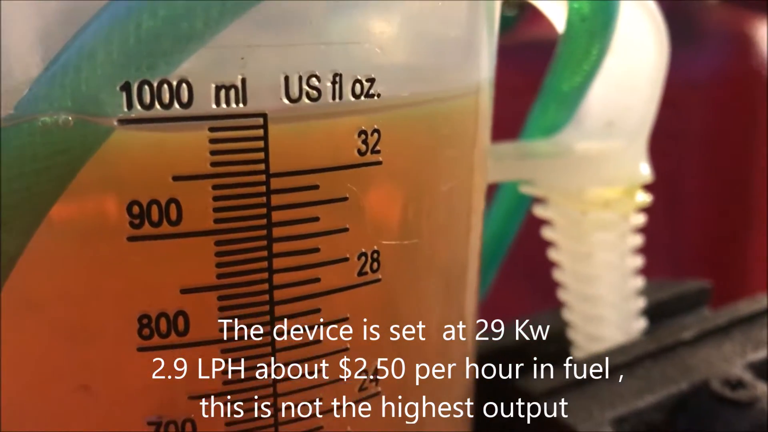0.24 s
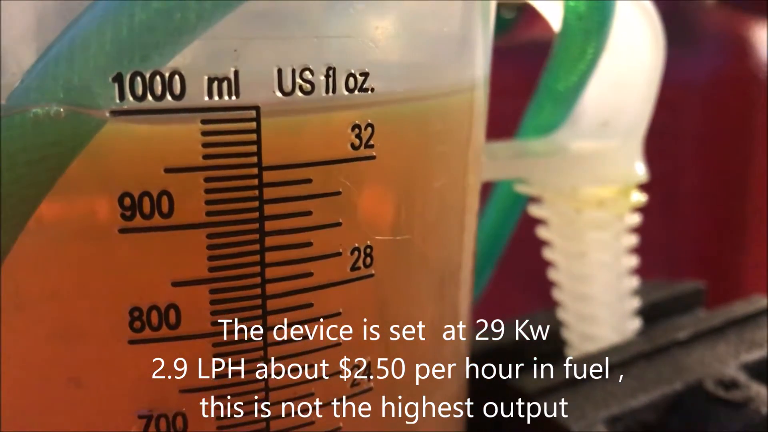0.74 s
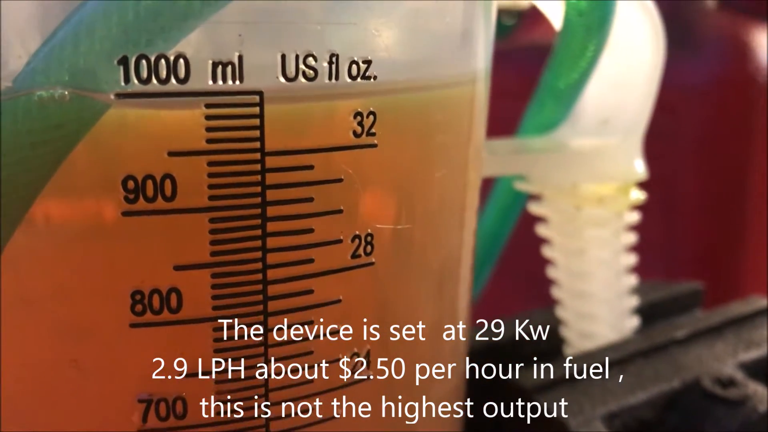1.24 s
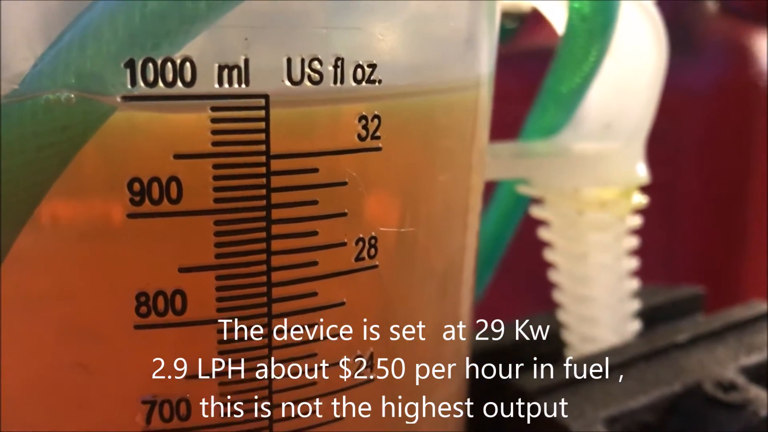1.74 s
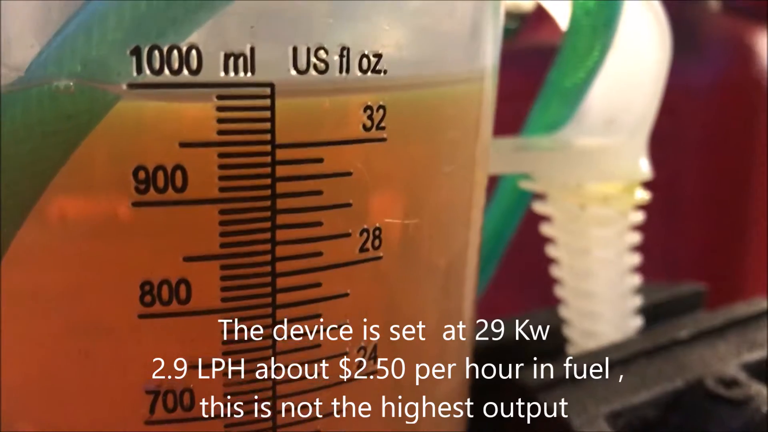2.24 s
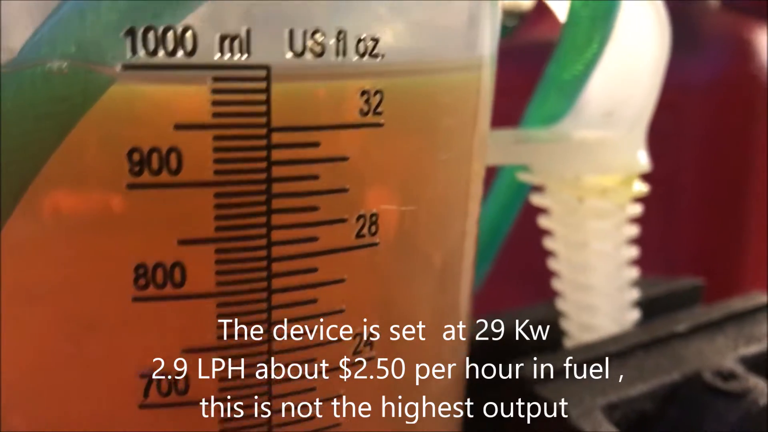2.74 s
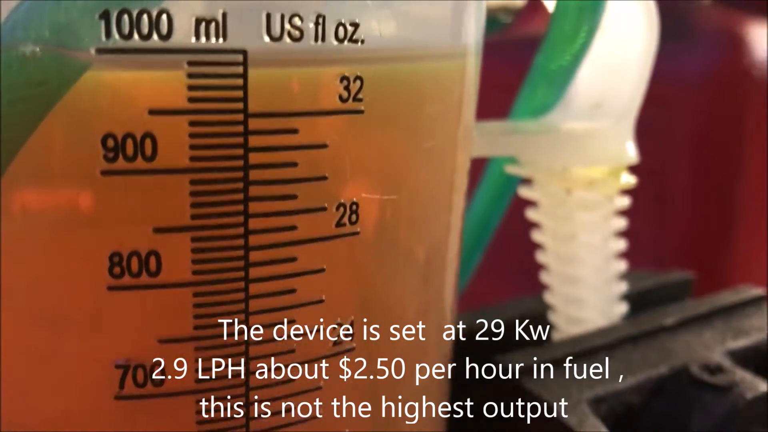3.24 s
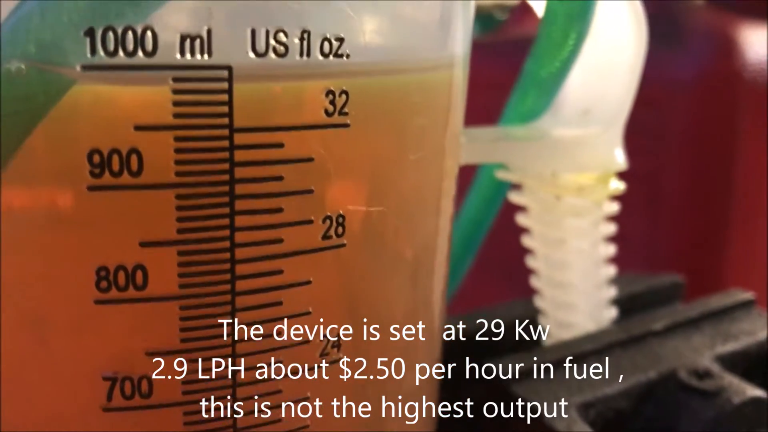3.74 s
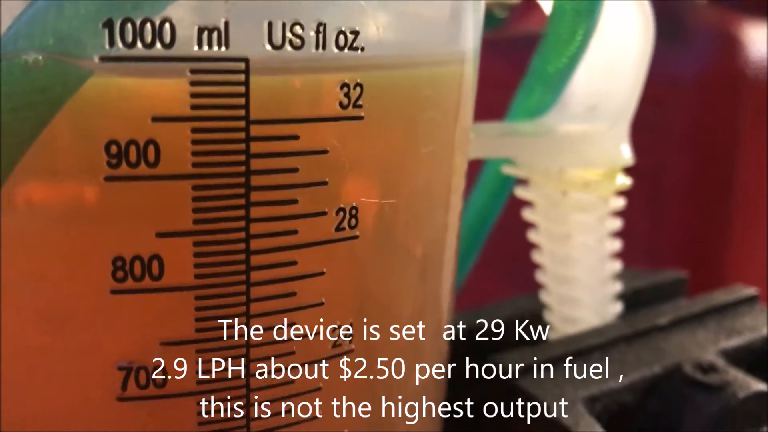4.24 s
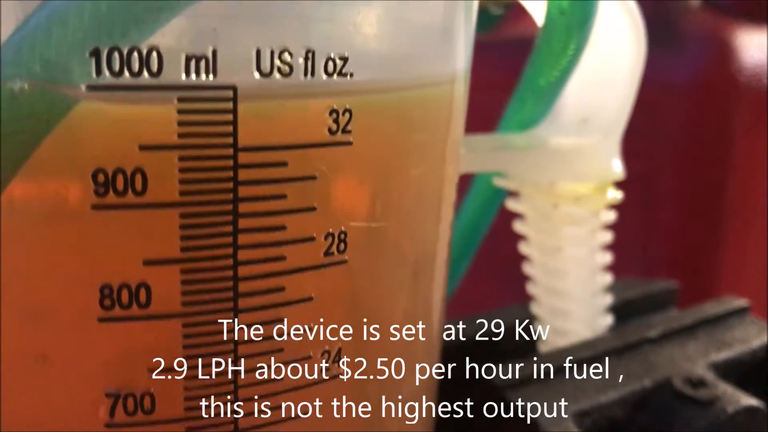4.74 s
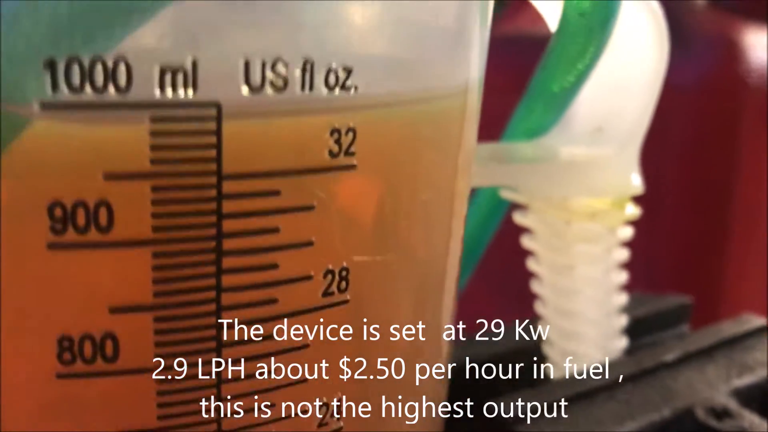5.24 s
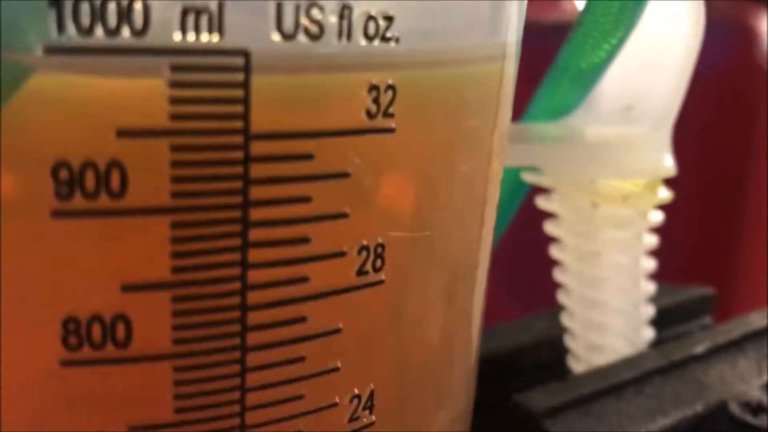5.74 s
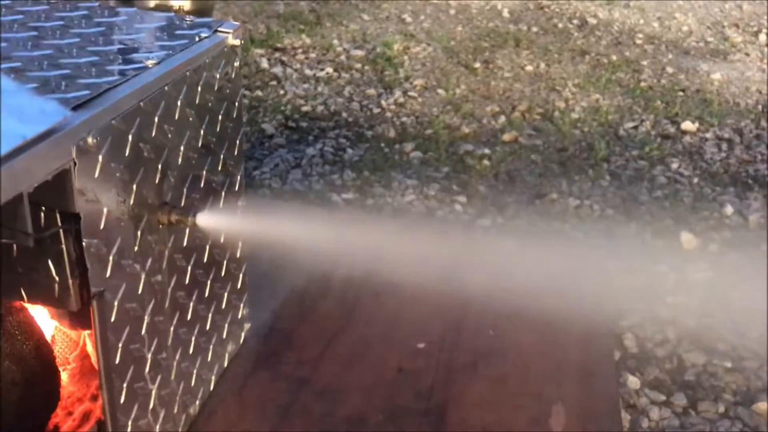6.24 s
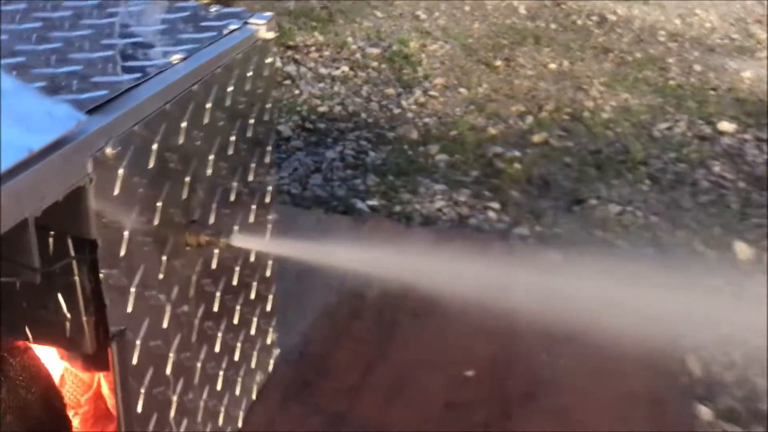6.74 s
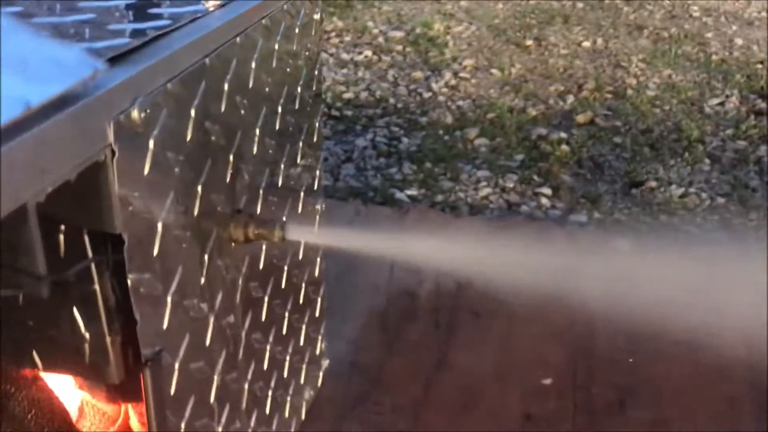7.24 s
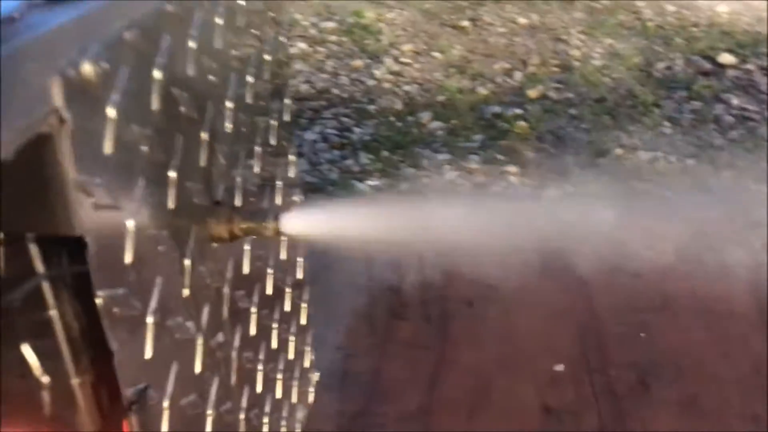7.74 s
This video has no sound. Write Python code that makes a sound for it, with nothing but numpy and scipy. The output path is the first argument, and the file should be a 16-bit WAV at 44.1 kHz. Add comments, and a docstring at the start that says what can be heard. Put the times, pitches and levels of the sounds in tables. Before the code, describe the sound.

From 0 to about 5.9 seconds an oil burner runs without pause: a loud low drone around 170 to 200 hertz, shifting between two close pitches, with irregular quick swells and dips. Under it are a broad flame roar with rapid flutter, a boxy metal casing resonance, motor hum and a thin throbbing whine. A soft, even steam hiss sits a few steps away. At 5.87 the perspective switches instantly to beside the nozzle. The hiss becomes much louder, bright yet hollow, with wet slugs sputtering in uneven bursts until about 6.85; small spits tick at 6.2 and, more sharply, 6.8. As the water clears, a ringing edge fades in, and its pitch sinks slightly. From 7.0 to 7.5 the jet is drier, hollow and strong, then eases; two brief sputters return near 7.9. The burner drones on underneath to the end at 8 seconds.

```python
"""An oil-fired steam boiler runs, heard first from the fuel jug: its flame drones as turbulent combustion
drives two modes of the gas column in firebox and flue. The flame also roars, the casing resonates with it, and
the burner motor hums and whines at multiples of its shaft speed. A brass nozzle hisses with jet turbulence.
At 5.868 s the listener is all at once beside the jet: the hiss is louder and hollow from low resonances, it
sputters as slugs of water break into spray, and two spits tick; a ring fades in as the water clears."""
import sys
import numpy as np
from scipy import signal
from scipy.fft import rfft, irfft, next_fast_len
from scipy.io import wavfile
from scipy.ndimage import uniform_filter1d, map_coordinates

SR = 44100
rng = np.random.default_rng(int(sys.argv[2]) if len(sys.argv) > 2 else 0)


def materialize(psi):
    """Save the field psi as 16-bit PCM at rate SR to the path in sys.argv[1].

    A 1-D psi becomes a single channel; in a 2-D psi each row is a channel.
    """
    bounded = np.clip(np.atleast_2d(psi).T, -1, 1)
    quanta = np.round(bounded * 32767).astype(np.int16)
    wavfile.write(sys.argv[1], SR, quanta)


N = 353241
t = np.arange(N) / SR
MOVE_S = 5.868  # the listener is at the jug before, at the nozzle after
SHAFT_HZ = 56.875  # mean turns of the burner shaft per second


def amp(db):
    """Decibel law: the amplitude gain of a level in dB."""
    return np.exp(np.asarray(db) * (np.log(10) / 20))


def unit(x):
    """Normalisation: x brought to rms 1."""
    return x / np.sqrt(np.mean(x ** 2) + 1e-20)


def curves(rows):
    """Linear interpolation: one value per sample for each column after the time."""
    s, *cols = np.transpose(rows)
    return [np.interp(t, s, c) for c in cols]


def wobble(rate, count=8):
    """Slow random modulation: a smooth curve through normal random knots, rate of them a second."""
    knots = rng.standard_normal(int(N * rate / SR) + 4)
    grid = np.arange(len(knots) * count) / count
    smooth = map_coordinates(knots, [grid], mode="nearest")
    return np.interp(t * rate + 1, grid, smooth)


def filtered(x, response):
    """Linear filtering: the spectrum of x times a response of frequency."""
    size = next_fast_len(N + SR // 2)
    spectrum = rfft(x, size) * response(np.fft.rfftfreq(size, 1 / SR))
    return irfft(spectrum, size)[:N]


def rush(colour):
    """Broadband turbulence: random noise of rms 1, coloured by (Hz, dB per Hz) rows."""
    f, db = np.transpose(colour)
    response = lambda hz: amp(np.interp(np.log(hz + 1), np.log(f), db))
    return unit(filtered(rng.standard_normal(N), response))


def resonant(modes, steep):
    """Resonance: noise of rms 1 in (Hz, half-power width, dB) modes; steep sets how fast skirts fall."""
    k = 2 ** (1 / steep) - 1  # makes w the half-power width

    def response(hz):
        power = sum(amp(db) ** 2 / (1 + k * ((hz - c) / (w / 2)) ** 2) ** steep for c, w, db in modes)
        return np.sqrt(power)

    return unit(filtered(rng.standard_normal(N), response))


def surging(modes, steep, depth_db, rate):
    """Independent modulation: resonances that each swell and sink alone, with rate random knots a second."""
    total = np.zeros(N)
    for c, w, db in modes:
        level = np.sqrt(w) * amp(db + depth_db * wobble(rate))  # root of the width keeps dB a peak height
        total += level * resonant([(c, w, db)], steep)
    return unit(total)


def saturated(ring, reaction_s, evening):
    """Saturation: a flow feeds a resonance only so much; evening (0-1) sets how level its swells stay."""
    power = uniform_filter1d(ring ** 2, round(reaction_s * SR))
    strength = np.sqrt(np.abs(power) + 1e-2)
    return unit(ring / strength ** evening)


def bump(middle, length):
    """Gaussian envelope: a smooth rise and fall of height 1, length being its width at 1/e."""
    return np.exp(-(2 * (t - middle) / length) ** 2)


def swelling(rows):
    """Amplitude modulation: gain that swells and dips at the given (middle s, length s, dB)."""
    return amp(sum(db * bump(s, length) for s, length, db in rows))


def walls(x, wet, count=8):
    """Comb filtering: x of rms 1 with early echoes off nearby metal, which ripple its spectrum."""
    delays_s = rng.uniform(.002, .014, count)
    echoes = sum(np.roll(x, round(d * SR)) for d in delays_s)
    return unit(x + wet / np.sqrt(count) * echoes)


def bent(x, ratio):
    """Resampling: x of rms 1 with all its frequencies moved by a changing ratio."""
    fine = signal.resample_poly(x, 2, 1)
    return unit(map_coordinates(fine, [2 * np.cumsum(ratio)], mode="wrap"))


# Gas column of firebox and flue. Each row: mode in Hz, half-power width in Hz, relative peak in dB.
FIREBOX = [(169.2, 16.9, -3.5), (202.85, 10.2, 2)]
# The two modes take turns. Each row: time in s, gain of the upper mode against the lower in dB.
SEESAW = [(0.35, -10), (0.7, 3.5), (0.95, 0.5), (1.2, 8.5), (1.55, -9), (2.07, 8.5), (2.6, -6), (3.1, 2),
          (3.45, -8.5), (3.8, 2), (4.2, 4), (4.65, -6), (5.45, 5.5), (5.8, -7), (6.15, -6), (6.42, 4.5),
          (6.7, -6.5), (7.3, 2.5), (8.01, 3)]
# The drone's clearest swells and dips. Each row: middle in s, length in s, change in dB.
DRONE_SWELLS = [(0.07, 0.16, -6.5), (0.3, 0.05, 3.5), (0.49, 0.08, 3.5), (0.74, .04, -7), (1.23, 0.052, 3),
                (1.34, .04, -8), (1.39, .06, 4), (1.44, 0.047, -11), (1.52, 0.045, 5.5), (1.71, 0.2, -4.5),
                (1.85, 0.11, 3), (1.97, 0.065, -10), (2.07, 0.081, 3.5), (2.23, 0.095, -7), (2.37, 0.15, 2),
                (2.74, 0.034, -2), (2.9, 0.04, 4.5), (3.04, 0.043, 5), (3.18, 0.04, 4.5), (3.31, 0.11, -7),
                (3.57, 0.056, 6), (3.72, 0.036, -7), (3.99, .04, -8), (4.15, 0.041, 5), (4.515, 0.029, -14),
                (5.11, .04, 5.5), (5.185, 0.056, 6), (5.25, 0.07, -8), (5.49, 0.05, 4.5), (5.64, 0.045, -6),
                (6.09, 0.15, -4.5), (6.4, 0.18, 1.5), (6.52, 0.067, -10), (6.63, .055, -6),
                (7.19, 0.04, 5.5), (7.42, 0.04, 5), (7.56, 0.18, 3), (7.68, 0.042, -15), (7.77, 0.08, 2.5),
                (7.855, 0.06, -11), (7.98, 0.066, -8.5)]
DRONE_DB, REACTION_S = -15, 0.051  # level, reaction time of the flame
SATURATION = .62  # how far the flame evens out its swells (0-1)
THROB_DB, THROBS_PER_S = 0.83, 19  # uneven burning: depth, random knots a second


def drone():
    """Thermoacoustic excitation: burning drives two gas-column modes, which take turns and beat unevenly."""
    seesaw_db, = curves(SEESAW)
    modes = []
    for c, w, db in FIREBOX:
        mode = saturated(resonant([(c, w, db)], steep=1.4), REACTION_S, SATURATION)
        modes.append(np.sqrt(w) * amp(db) * mode)
    lower, upper = modes
    ring = unit(amp(-seesaw_db / 2) * lower + amp(seesaw_db / 2) * upper)
    throb = amp(DRONE_DB + THROB_DB * wobble(THROBS_PER_S))
    return throb * swelling(DRONE_SWELLS) * saturated(ring, REACTION_S, SATURATION)


# Flame roar at the jug and at the nozzle. Each row: frequency in Hz, relative density in dB per Hz.
ROAR_JUG = [(30, -36), (48, -23), (85, -4.5), (125, -8.5), (155, -1), (228, 2), (256, -11), (480, -12),
            (600, -18.5), (775, -17), (930, -22.5), (1150, -28), (2400, -46.5)]
ROAR_NOZZLE = [(20, -21), (38, -26), (55, -8), (95, -5), (140, 3), (245, 1), (310, -17), (370, -20),
               (460, -17), (600, -17), (840, -20), (1000, -18), (2400, -36)]
# Flutter of the flame. Each row: frequency in Hz, relative density in dB per Hz.
FLUTTER = [(500, -29), (950, 1), (1120, -2.5), (1400, 1), (2050, -6), (2400, -34), (5000, -41)]
PUFF_DB, PUFF_SPIKE = 0.5, 0.71  # flutter: depth of its swing, height of its sharp peak
PUFF_SCATTER_DB = 0.7  # uneven strength from turn to turn


def roar(angle, near):
    """Combustion noise: turbulent burning roars over a wide band and flutters with each shaft turn."""
    jug = amp(-23) * rush(ROAR_JUG)
    nozzle = amp(-21.0) * rush(ROAR_NOZZLE)
    body = (1 - near) * jug + near * nozzle
    peak = ((1 + np.cos(angle)) / 2) ** 20
    turn = amp(PUFF_DB * np.cos(angle)) + PUFF_SPIKE * peak
    puffs = unit(turn * amp(PUFF_SCATTER_DB * wobble(SHAFT_HZ)))
    return body + amp(-36.5) * walls(puffs * rush(FLUTTER), wet=0.41)


# Casing resonances at the jug and at the nozzle. Each row: centre in Hz, half-power width in Hz,
# relative peak in dB.
CASING_JUG = [(527, 27, -4.5), (584.5, 34, 3), (634, 21, 1), (689, 66, -3.5), (857, 46, -2.5)]
CASING_NOZZLE = [(587, 88, 0), (690, 110, -2)]
# The casing varies as the listener drifts by the fire door. Each row: time in s, change of level in dB.
DOOR = [(5.87, 0), (6.3, -1), (6.75, 1.5), (7, -0.5), (7.4, 1.5), (7.7, -3), (8.01, -0.5)]
CASING_JUG_DB, CASING_NOZZLE_DB = -28, -27.5  # level at each place
CASING_SWAY_DB, CASING_LUMP_DB = .4, 1.3  # slow and quick unevenness
CASING_SURGE_DB = 1.2  # how far each resonance swells at the jug


def casing(near):
    """Structural resonance: the roar rings in the boiler's casing, in short clustered surges."""
    door_db, = curves(DOOR)
    jug = amp(CASING_JUG_DB) * surging(CASING_JUG, steep=1.5, depth_db=CASING_SURGE_DB, rate=9)
    nozzle = amp(CASING_NOZZLE_DB + door_db) * resonant(CASING_NOZZLE, steep=1.7)
    lumps = amp(CASING_SWAY_DB * wobble(7) + CASING_LUMP_DB * wobble(45))
    return lumps * ((1 - near) * jug + near * nozzle)


# Hum lines that rise or fade as the listener drifts through the burner's standing waves. Each row:
# multiple of the shaft speed, start in s, end in s, change in dB at the nozzle.
HUM_DRIFT = [(1, 6.1, 6.8, 2), (9, 6.6, 6.9, -5), (10, 7.45, 7.7, -6), (14, 6.5, 7.3, 7),
             (16, 7.42, 7.65, -14), (17, 6.7, 7.1, 6.5)]


def shaft_tones(orders, angle, near, waver_db):
    """Harmonic synthesis: lines locked to the shaft, each wavering alone, with a level for each place."""
    drift_db = {k: np.interp(t, [start, end], [0, db]) for k, start, end, db in HUM_DRIFT}
    tones = np.zeros(N)
    for k, jug, nozzle in orders:
        nozzle_db = nozzle + drift_db.get(k, 0)
        level_db = jug + near * (nozzle_db - jug) + waver_db * wobble(4)
        phase = rng.uniform(0, 2 * np.pi)
        tones += np.sqrt(2) * amp(level_db) * np.sin(k * angle + phase)
    return tones


# Burner hum. Each row: multiple of the shaft speed, rms level at the jug in dB, at the nozzle in dB.
HUM = [(1, -39, -34.5), (2, -33.5, -34), (5, -36, -42), (6, -39, -47), (7, -37.5, -45), (9, -50, -36.2),
       (10, -46, -32.7), (12, -40, -45), (13, -42, -42), (14, -36.7, -41.5), (16, -58, -37), (17, -51, -48),
       (18, -47.5, -57), (19, -47, -49), (20, -50, -53), (21, -47, -47), (23, -51, -49), (24, -47, -49),
       (25, -53, -50), (26, -55, -52)]
# Motor whine before its throb. Each row: multiple of the shaft speed, rms level at the jug in dB,
# at the nozzle in dB.
WHINE = [(68, -50.7, -48), (134, -62, -66), (136, -50.2, -55), (204, -56.5, -56)]
WHINE_WAVER_DB, WHINE_THROB = .85, .6  # random waver, depth of the throb (0-1)


def motor(angle, near):
    """Periodic forcing: fan and pump hum, the whine throbs once a turn, one more hum runs off the shaft."""
    hum = shaft_tones(HUM, angle, near, waver_db=.7)
    whine = shaft_tones(WHINE, angle, near, WHINE_WAVER_DB) * (1 + WHINE_THROB * np.cos(angle))
    # this hum runs apart from the shaft speed
    stray = amp(-35.5 - 8.3 * near) * np.sin(2 * np.pi * 323 * t + 0.53 * wobble(3.34))
    return hum + whine + stray


# Steam heard from the jug. Each row: frequency in Hz, relative density in dB per Hz.
FAR_STEAM = [(1500, -13.5), (2150, -1.5), (2850, -6), (3100, -2), (3400, -6), (4200, -2), (4900, -3.5),
             (6250, -1), (8000, -6), (9500, -1), (10500, -10), (11300, -9), (12800, -9.5), (15500, -15.5)]
# The distant hiss swells a little. Each row: middle in s, length in s, change in dB.
FAR_SWELLS = [(0.25, 0.39, 2), (2.07, 0.17, 2.5)]
FAR_DB, FAR_DRIFT_DB, FAR_FLICKER_DB = -36.9, .25, .35  # level, slow drift, quick flicker


def far_steam():
    """Jet noise with reflections: an even hiss from a few steps away, coloured by the surfaces around."""
    level_db = FAR_DB + FAR_DRIFT_DB * wobble(1.2) + FAR_FLICKER_DB * wobble(18)
    return amp(level_db) * swelling(FAR_SWELLS) * walls(rush(FAR_STEAM), wet=0.16)


# Dry steam beside the nozzle. Each row: frequency in Hz, relative density in dB per Hz.
JET = [(700, -15), (1700, -7), (2700, 3), (3200, 1), (3700, -3), (5000, -2), (6500, 5.5), (7400, -2),
       (7950, 3.5), (9450, 7.5), (10400, -4), (11500, 4), (13400, 5), (15700, 0.5)]
# Level of the dry jet. Each row: time in s, level in dB.
JET_LEVEL = [(5.87, -33.5), (6.6, -33.5), (6.9, -32), (7.25, -30.5), (7.55, -31.5), (7.7, -33.5),
             (8.01, -33)]
# Gain of the jet's top treble. Each row: time in s, gain in dB.
JET_TOP = [(5.87, 2), (6.7, 1.5), (7.4, 0), (7.7, -2), (8.01, 0)]
# Ring of the dry jet. Each row: centre in Hz, half-power width in Hz, relative peak in dB.
JET_RING = [(4570, 230, 0.5), (4870, 170, 2.5), (8030, 290, -2.5)]
# The water clears, here and in the spray: start and end [s].
CLEARING_S = [6.2, 6.9]
TOP_FROM_HZ, JET_FLICKER_DB = 9500, .45
RING_DB, RING_SURGE_DB = -2.2, 1.2  # ring against the dry jet, surge of each resonance


def dry_jet(shift):
    """Jet turbulence and resonance: dry steam hisses; a ring fades in as the water clears, follows the
    jet's level and surges unevenly."""
    jet_db, = curves(JET_LEVEL)
    top_db, = curves(JET_TOP)
    turbulence = walls(rush(JET), wet=0.22)
    top = filtered(turbulence, lambda hz: hz > TOP_FROM_HZ)
    hiss = amp(JET_FLICKER_DB * wobble(25)) * (turbulence - top + amp(top_db) * top)
    modes = bent(surging(JET_RING, steep=3.2, depth_db=RING_SURGE_DB, rate=35), shift)
    ring = amp(RING_DB) * np.interp(t, CLEARING_S, [0, 1]) * modes
    return amp(jet_db) * (hiss + ring)


# Resonances of the hollow rush. Each row: centre in Hz, half-power width in Hz, relative peak in dB.
HOLLOW = [(1160, 53, -6.5), (1334, 74, 0), (1425, 110, -6.5), (1540, 130, -8), (1753, 77, -15)]
# Level of the hollow rush. Each row: time in s, level in dB.
HOLLOW_LEVEL = [(5.87, -25), (6.08, -27.7), (6.22, -25.7), (6.5, -28.3), (6.97, -27), (7.1, -24.7),
                (7.35, -24.5), (7.72, -27.5), (8.01, -27.8)]
GURGLE_DB, GURGLES_PER_S = 1.4, 90  # fine gurgle: depth, random knots a second
HOLLOW_REACTION_S, HOLLOW_SATURATION = .05, .45  # reaction time, evening of the swells (0-1)


def hollow_rush():
    """Flow-excited resonance: steam drives low modes with a fine gurgle, loudest once the nozzle runs dry."""
    level_db, = curves(HOLLOW_LEVEL)
    modes = saturated(resonant(HOLLOW, steep=2.5), HOLLOW_REACTION_S, HOLLOW_SATURATION)
    return amp(level_db + GURGLE_DB * wobble(GURGLES_PER_S)) * modes


SLUG_ATTACK_S, SLUG_RELEASE_S = 0.009, 0.014  # time constants


def slug(start, length):
    """Exponential relaxation: a slug of water fills the nozzle, holds and is blown clear."""
    filling = 1 - np.exp(-np.maximum(t - start, 0) / SLUG_ATTACK_S)
    return filling * np.exp(-np.maximum(t - start - length, 0) / SLUG_RELEASE_S)


# Slugs of water in the nozzle. Each row: start in s, length in s, spray level of a full slug in dB.
SLUGS = [(5.855, 0.05, -26.7), (5.978, .066, -26.8), (6.095, 0.135, -25.5), (6.25, 0.243, -25.8),
         (6.497, .2, -25.4), (6.697, 0.146, -23.7), (7.886, .025, -27), (7.956, .026, -26)]
# Fine spray that never stops: level before and after the water clears [dB].
MIST_DB = [-33, -35]
# Bands in which the spray rings. Each row: centre in Hz, half-power width in Hz, relative peak in dB.
SPRAY = [(2150, 320, -4), (2620, 320, 2), (3290, 190, 2), (3580, 200, 1.5), (3900, 220, 1),
         (4620, 350, 1.5), (5050, 340, -6), (5500, 2600, -10.5), (5970, 520, -1.7), (7200, 480, -1.5),
         (8200, 600, -11), (9400, 600, -9)]
DROPLET_DB, CRACKLE_DB = 1.1, 1.5  # coarse and fine roughness
SPRAY_SURGE_DB = 1.1  # how far each band swells and sinks


def spray(shift):
    """Two-phase flow: slugs of water tear into a rough, sputtering spray that rings in bands."""
    slugs = sum(amp(db) * slug(s, length) for s, length, db in SLUGS)
    mist = amp(np.interp(t, CLEARING_S, MIST_DB))
    droplets = unit(amp(DROPLET_DB * wobble(90) + CRACKLE_DB * wobble(400)))
    bands = surging(SPRAY, steep=4, depth_db=SPRAY_SURGE_DB, rate=30)
    return np.hypot(mist, slugs) * droplets * bent(bands, shift)


# Single spits of water. Each row: time in s, initial level in dB.
SPITS = [(6.21, -17), (6.8228, -12.5)]
# Colour of a spit. Each row: frequency in Hz, relative density in dB per Hz.
SPIT_COLOUR = [(300, -20), (900, 3), (1800, -1), (3000, -1), (6500, -6), (9000, -13), (15000, -22)]
SPIT_DECAY_S = .004  # time constant


def spits():
    """Impulsive noise: a drop bursts out of the nozzle with a sudden tick that decays exponentially."""
    bursts = sum(amp(db) * (t >= s) * np.exp(-np.abs(t - s) / SPIT_DECAY_S) for s, db in SPITS)
    return bursts * rush(SPIT_COLOUR)


# Ring and spray bands sink as the listener moves round the jet. Each row: time in s, frequency ratio.
ANGLE_SHIFT = [(5.87, 1), (6.5, 1), (6.8, .975), (6.95, .94), (7.5, .925), (8.01, .91)]


def near_steam():
    """Superposition: dry jet, hollow rush, spray and spits; ring and spray sink as the listener moves."""
    shift, = curves(ANGLE_SHIFT)
    return dry_jet(shift) + hollow_rush() + spray(shift) + spits()


def scene():
    """Superposition: burner and steam, heard first at the jug and then at the nozzle."""
    near = np.clip((t - MOVE_S) / 0.0016, 0, 1)  # 0 at the jug, 1 at the nozzle
    speed_hz = SHAFT_HZ + .022 * wobble(2) + .012 * wobble(14)
    angle = 2 * np.pi * np.cumsum(speed_hz) / SR
    burner = drone() + roar(angle, near) + casing(near) + motor(angle, near)
    steam = (1 - near) * far_steam() + near * near_steam()
    return (burner + steam)[None]


TOP_HZ, LOW_CUT_HZ = 15750, 45  # band limits of the microphone


def record(dry):
    """Soft limiting and band limiting: the microphone rounds tall peaks, sheds deep bass and top treble."""
    rounded = dry / (1 + (dry / .97) ** 8) ** (1 / 8)
    response = lambda hz: (hz < TOP_HZ) / np.sqrt(1 + (LOW_CUT_HZ / (hz + 1)) ** 8)
    return np.array([filtered(channel, response) for channel in rounded])


dry = scene()
out = record(dry)
materialize(out)
```